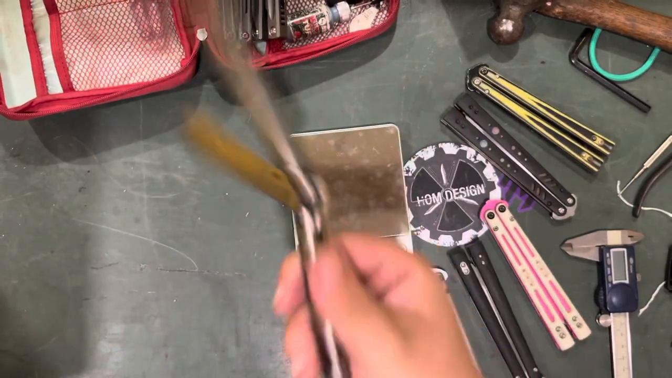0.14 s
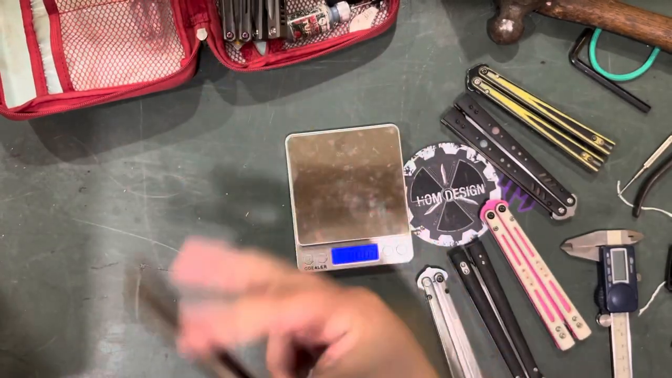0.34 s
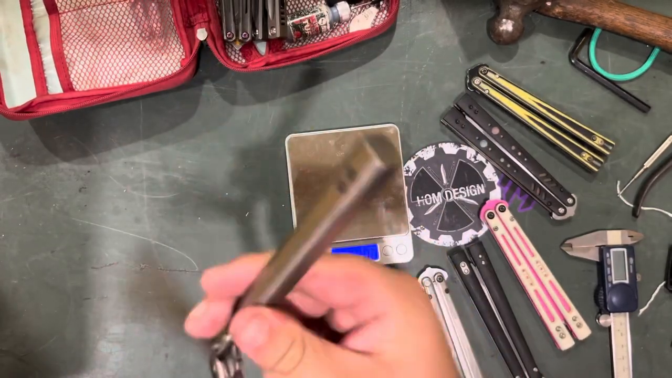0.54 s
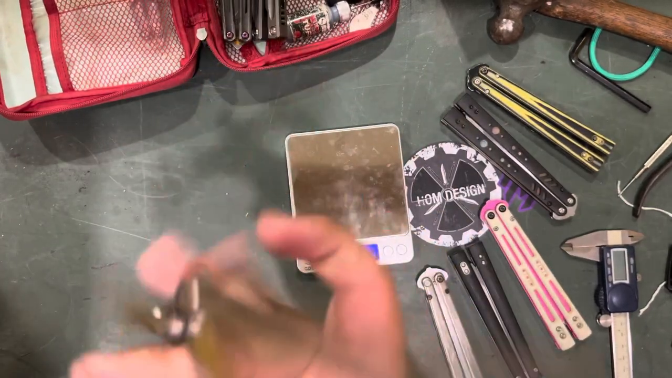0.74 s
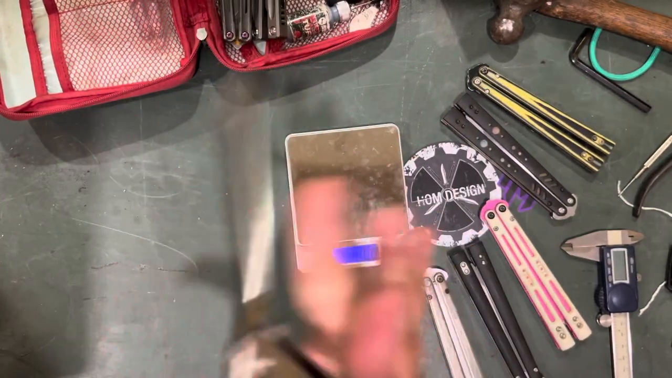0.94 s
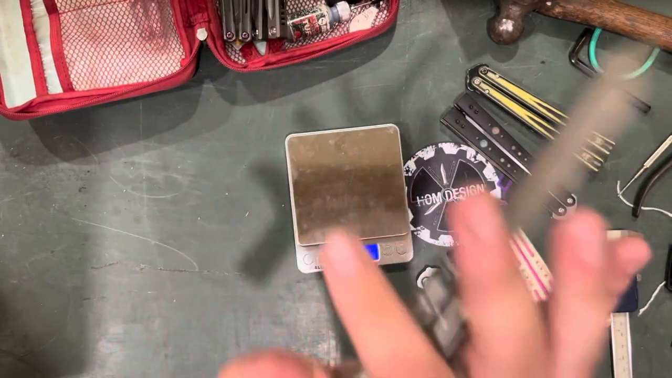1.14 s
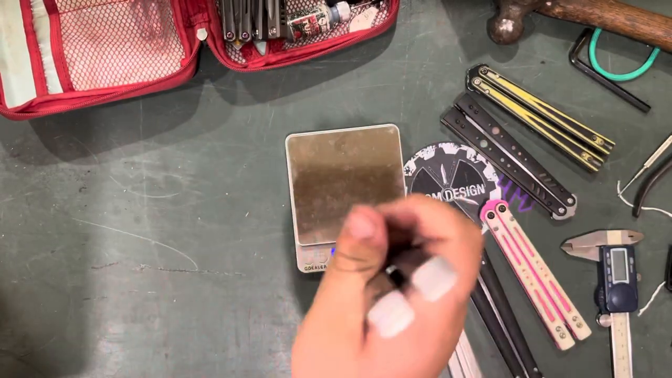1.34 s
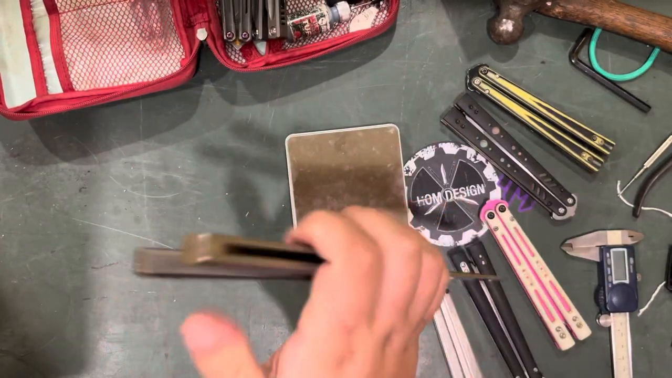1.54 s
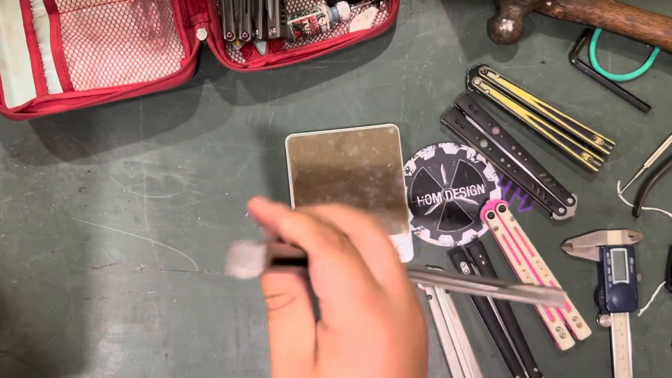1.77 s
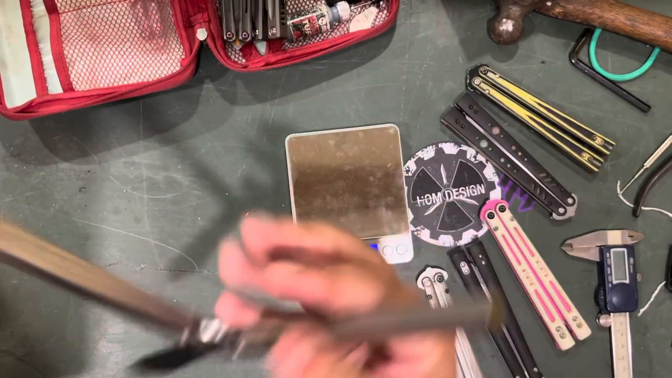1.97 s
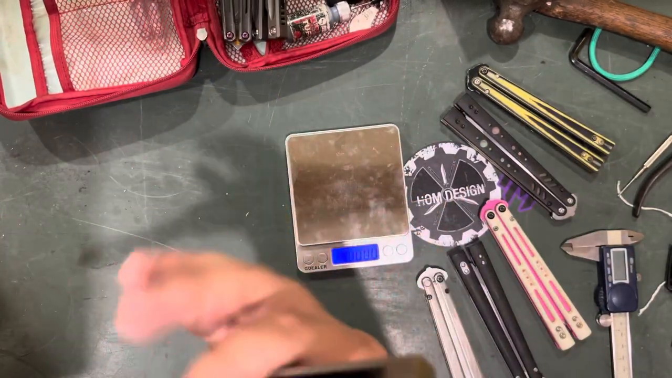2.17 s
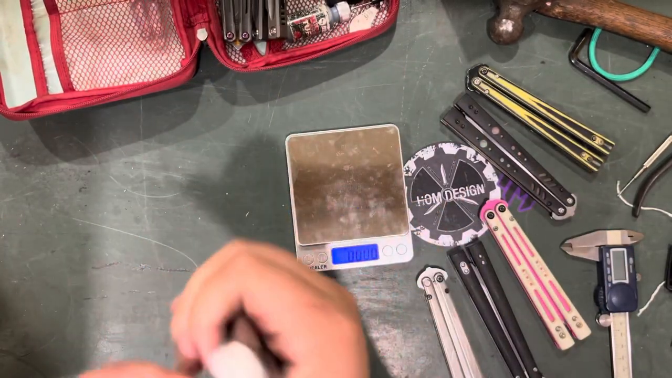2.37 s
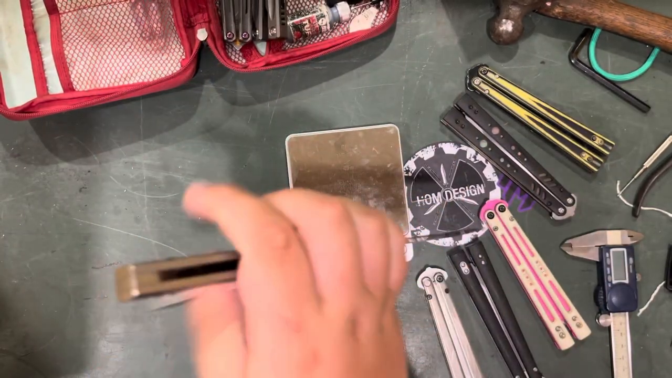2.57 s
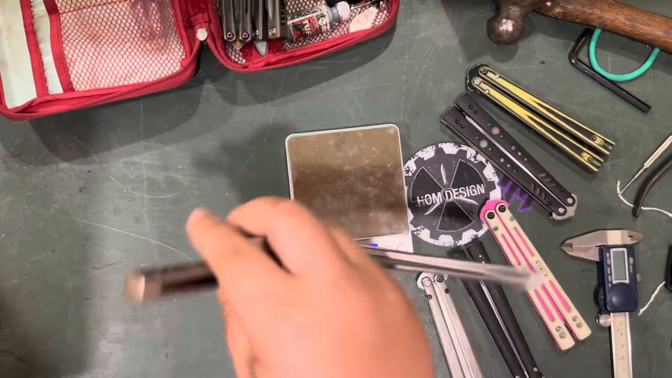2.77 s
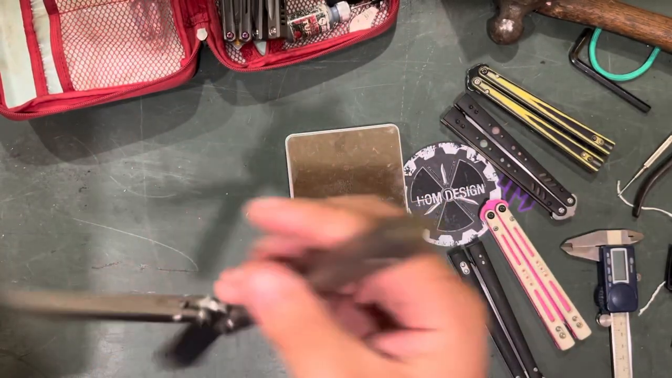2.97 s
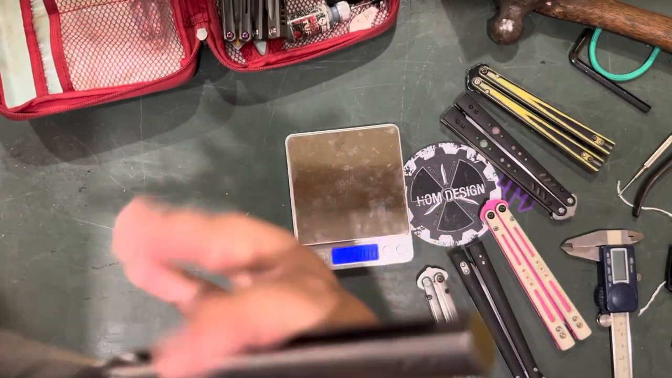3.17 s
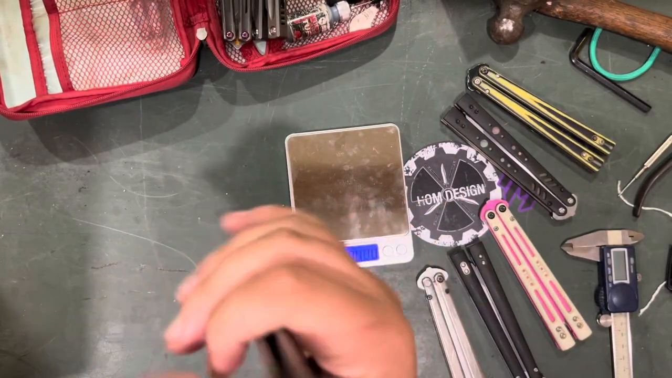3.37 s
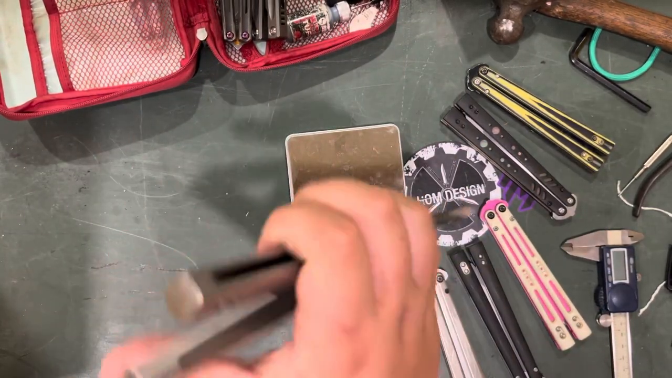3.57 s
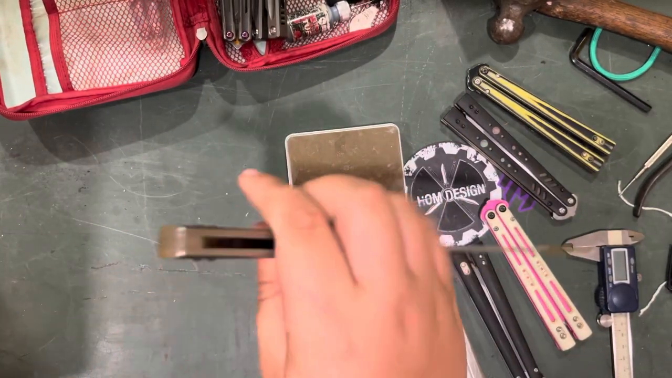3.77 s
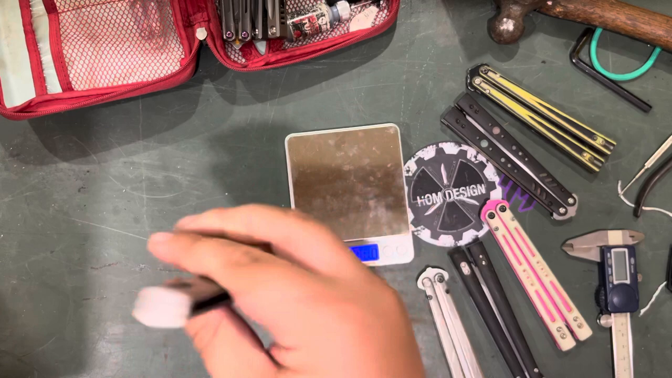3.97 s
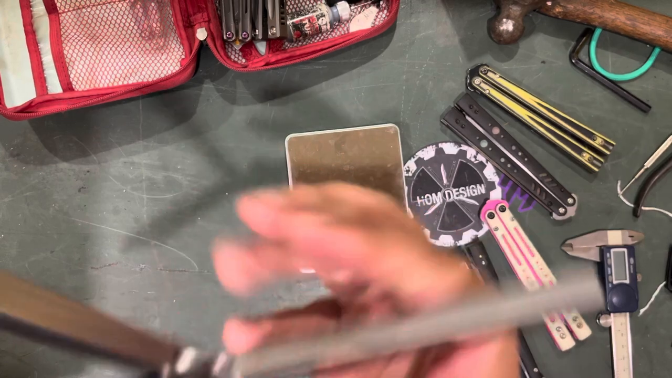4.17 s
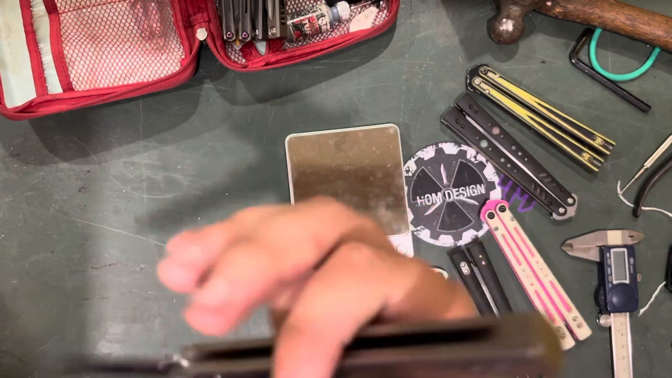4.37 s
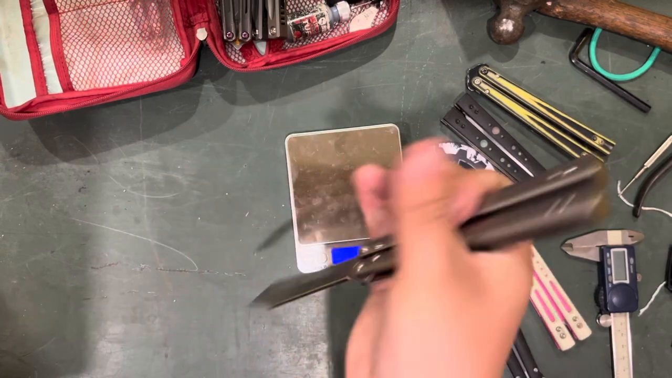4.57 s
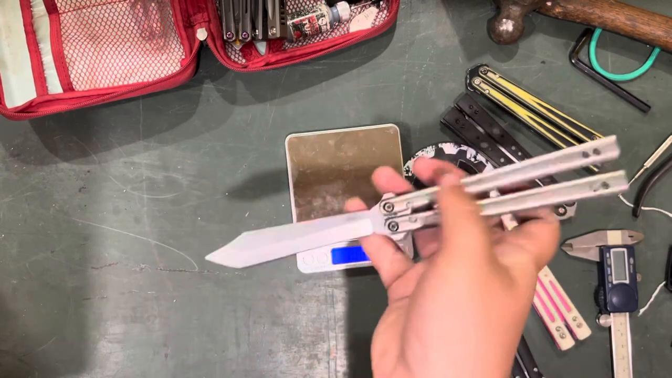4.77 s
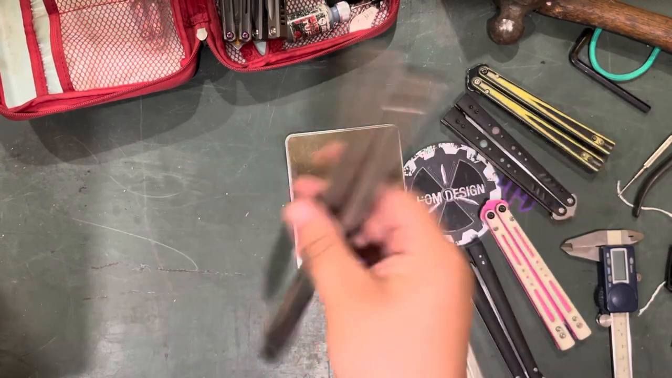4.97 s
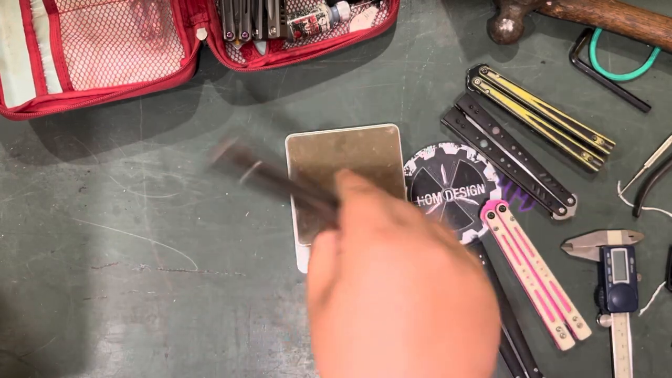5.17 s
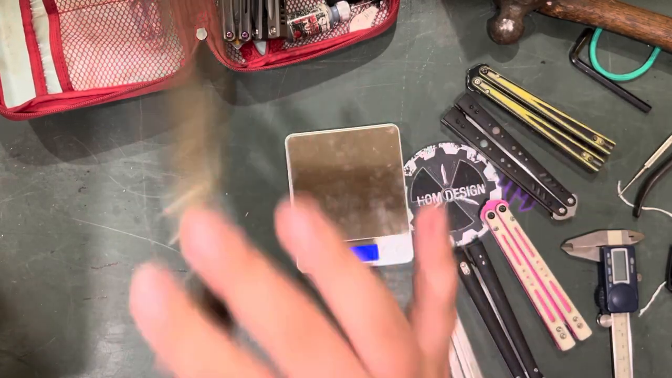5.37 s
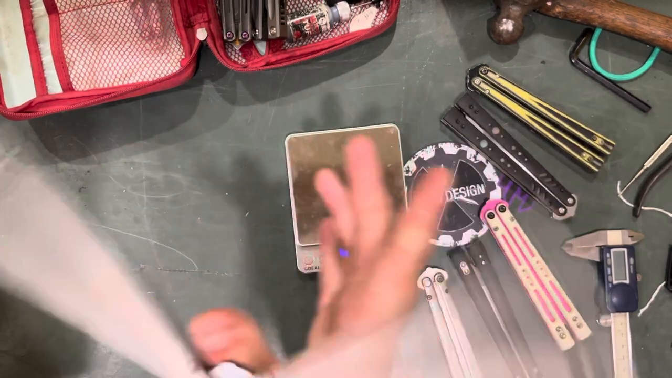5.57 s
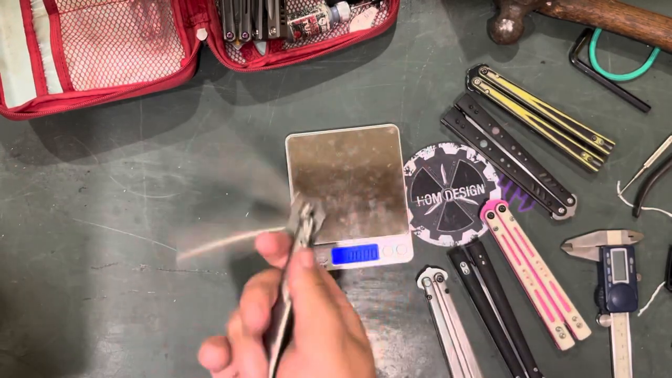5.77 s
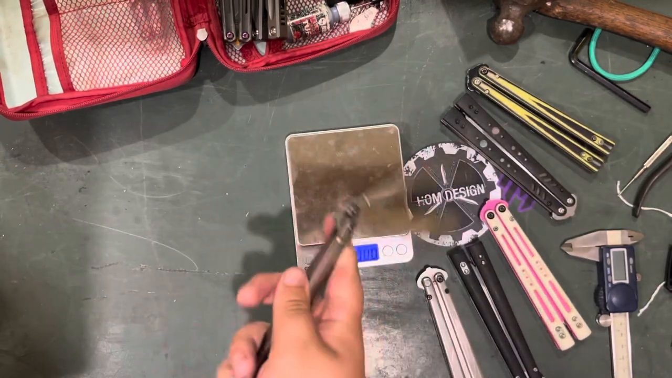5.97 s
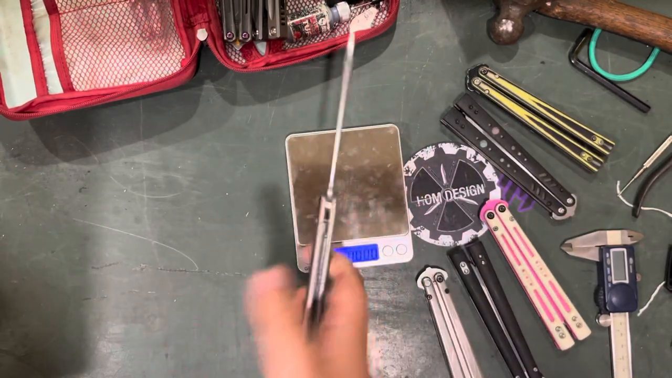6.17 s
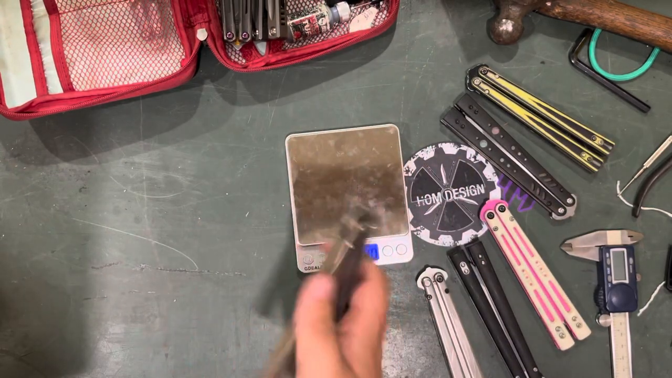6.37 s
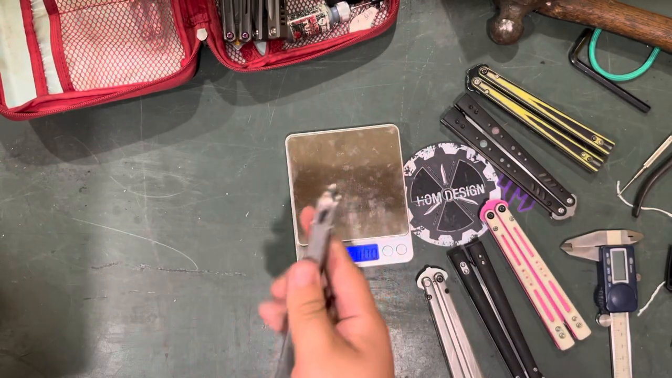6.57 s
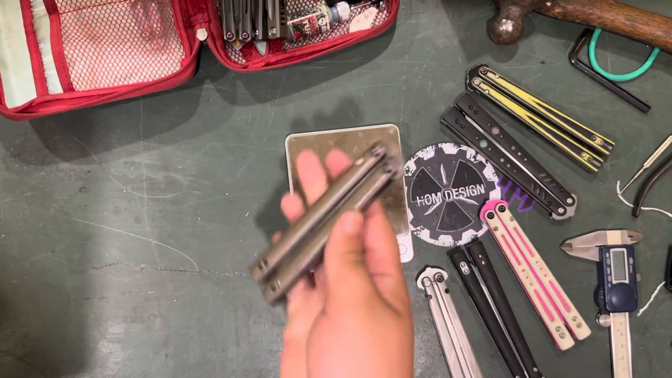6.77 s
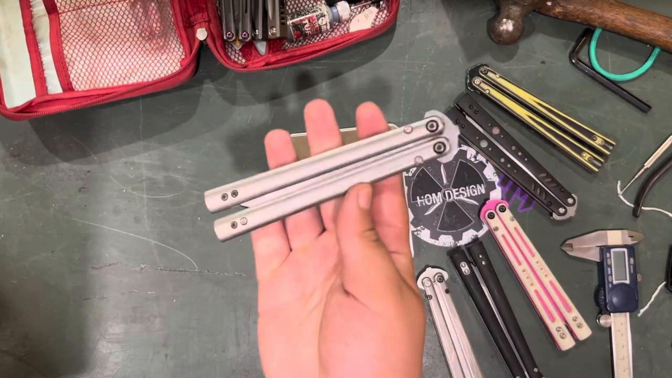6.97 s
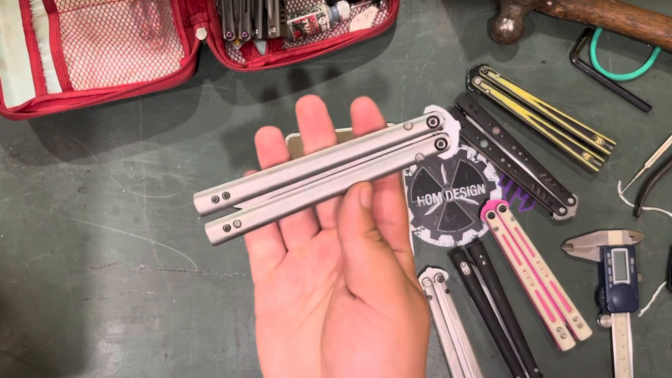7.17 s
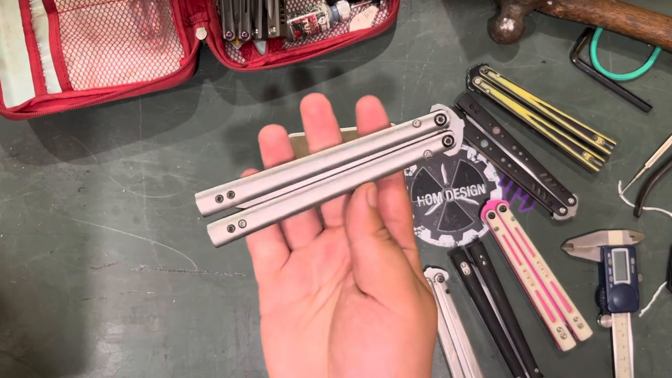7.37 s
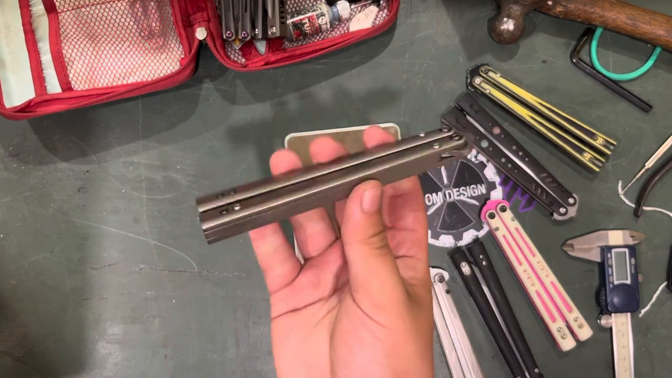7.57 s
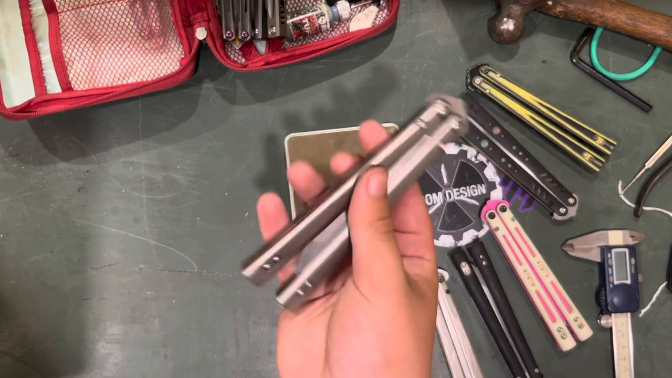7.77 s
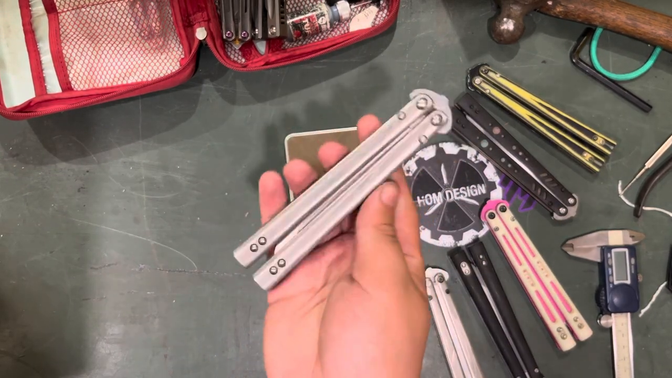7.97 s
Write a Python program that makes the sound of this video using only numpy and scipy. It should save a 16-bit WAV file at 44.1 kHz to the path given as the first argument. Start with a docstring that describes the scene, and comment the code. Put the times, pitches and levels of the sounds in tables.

```python
"""Butterfly knife in a small room

A swung handle clacks on its stop pin, bounces in rattles, and chatters to rest in a buzz of rising pitch;
each blow sums a pressure pulse, decaying modes of the gripped metal and a crack of filtered noise.
Clusters of close sines ring on when a part swings free, and sinking sines thump in the palm.
Shaped noise makes sliding fingers, a low rumble and a fan, whose hum is three wavering sines.
Decaying noise bands answer as the room, and two ports receive knife, hand and room with unequal phase."""
import sys
import numpy as np
from scipy import signal
from scipy.fft import rfft, irfft
from scipy.io import wavfile
from scipy.ndimage import uniform_filter1d

SR = 44100
rng = np.random.default_rng(int(sys.argv[2]) if len(sys.argv) > 2 else 0)


def inscribe(sig):
    """Save sig as 16-bit PCM at rate SR to the path in sys.argv[1].

    A 1-D sig is mono; a 2-D sig holds one channel per row.
    Samples are clipped to [-1, 1] before scaling.
    """
    pcm = np.round(np.clip(np.atleast_2d(sig).T, -1, 1) * 32767)
    wavfile.write(sys.argv[1], SR, pcm.astype(np.int16))


N = 354190
TIME = np.arange(N) / SR  # seconds
BLOW_SAMPLES = 2048  # length of one blow
TOP_HZ = 16300  # upper edge of the output band
AIR_DB = -68  # moving air, before its trim and wander
MIDDLING_DB = -34.5  # handle-ring level of a middling blow

# Spectrum of fan and room air. Each row: frequency in Hz, relative density in dB per Hz.
AIR_SPECTRUM = [(25, -23.5), (55, -5.5), (85, -9.5), (113, -6.5), (180, -11.5), (215, -4), (270, -19.5),
                (410, -14), (700, -24.5), (1150, -25), (1500, -12), (1850, -13.5), (2600, -35.5),
                (13000, -54.5)]
# Hum of the fan. Each row: frequency in Hz, level in dB before trim and waver.
HUM_TONES = [(59.2, -72.5), (113.0, -73.5), (215.3, -76)]
# Low rumble of stirred air, with the deep part of the palm thump near 0.74 s.
# Each row: time in seconds, level in dB before trim and wander.
RUMBLE_LEVELS = [(0.0, -64.5), (0.15, -71.5), (0.62, -63), (0.74, -50.5), (0.78, -64), (2.48, -66.5),
                 (2.52, -64), (4.99, -80), (6.49, -70), (6.73, -80), (7.9, -64.5), (8.03, -67)]
# Spectrum of that rumble. Each row: frequency in Hz, relative level in dB.
RUMBLE_SPECTRUM = [(25, -29.5), (55, 0), (80, -6), (120, -5.5), (200, -21), (500, -51)]
# Fingers sliding on the handles. Each row: middle in seconds, length in seconds, level in dB before the grain.
FINGER_STROKES = [(0.357, 0.33, -87), (0.626, 0.53, -76), (0.987, 0.16, -61.5), (4.967, 0.13, -72),
                  (5.24, .16, -82), (5.452, 0.17, -74.5), (5.715, 0.107, -75.5), (7.747, 0.27, -81),
                  (7.999, 0.25, -80.5)]
# Spectrum of sliding skin. Each row: frequency in Hz, relative level in dB.
SKIN_SPECTRUM = [(300, -21), (1500, 2.0), (2400, -3.5), (5000, 3.0), (7000, -1), (9500, 3),
                 (12000, -16.0), (15000, -16.0)]
# Single strikes of a handle. Each row: start in seconds, handle-ring level in dB before trim,
# brightness in dB (lifts overtone, blade and pin tick).
SINGLE_CLACKS = [(0.4768, -63, 6), (0.7115, -29, 0.5), (0.8893, -57.5, 7), (1.067, -20.5, 0),
                 (1.583, -31, -10), (1.5983, -39, -8), (1.7433, -30, 2), (1.7885, -30.5, 3),
                 (1.817, -37.5, -3), (2.5888, -42.5, -10), (2.7582, -38.5, -9.5), (3.014, -42, -8.5),
                 (3.595, -37, -10), (3.7193, -59, -7.5), (3.904, -33, 1.5), (4.132, -31, -1.5),
                 (4.65, -43, -13), (4.8092, -58, 5.5), (5.7413, -61.5, -4.5), (5.7672, -60.5, -5),
                 (5.8545, -21, -1.5), (6.111, -20.5, -5), (6.1415, -32, 4.5), (6.279, -30, 5),
                 (6.3473, -13.5, -6.5), (6.3817, -22, 2), (7.9356, -44, -10.5), (7.9547, -45, -12)]
# Modes of the gripped knife. Each row: frequency in Hz before detuning, relative level in dB,
# time to decay by 60 dB in seconds.
KNIFE_MODES = [(2310, -10, 0.031), (2376, -5.5, 0.013), (2472, -4.5, 0.027), (2685, -0.5, 0.014),
               (2960, -4, 0.013), (3630, -7, 0.003), (3840, 4, 0.012), (4113, -0.5, 0.021),
               (4030, -7, 0.024), (5470, -5, 0.017), (5228, 3, 0.02), (5640, 0.5, 0.0049),
               (5670, 6.5, 0.0085), (6320, 7, 0.0061), (7150, 0, 0.011), (7800, -9.5, 0.0055),
               (8330, -9, 0.012), (9030, 0, 0.0082), (9180, -1.5, 0.014), (9657, 2.5, 0.0057),
               (10730, -3, 0.0043), (13900, -4.5, 0.0049), (14600, -9.5, 0.0089)]
# Bands of handle ring, overtone, blade and pin tick. Each row: lowest Hz, highest Hz.
PART_BANDS = [(1800, 3300), (3300, 4600), (4600, 7500), (7500, 16500)]
# Crack of metal on metal. Each row: frequency in Hz, relative level in dB.
CRACK_SPECTRUM = [(1800, -6.5), (2300, 6.5), (6000, 9.5), (10300, 9.5), (12000, -6), (15500, -9.5),
                  (16500, -24)]
# Balance of knock, overtone, blade and pin tick in a middling blow. Each row: dB relative to the handle ring,
# further dB per dB of force.
FORCE_COLOUR = [(-21.5, -0.4051), (-3.5, -0.03), (0, 0.13), (-2, 0.2)]
# The knife landing in the hand. Each row: time in seconds, peak level in dB before trim, base pitch in Hz.
PALM_CATCHES = [(.477, -38, 206), (.71, -31, 319), (.887, -39.5, 104), (.98, -35, 380), (1.064, -33.5, 210),
                (1.743, -36.5, 406), (1.788, -32.5, 413), (2.757, -40, 389), (3.902, -40, 415),
                (4.65, -56.5, 105.3), (6.347, -27.5, 560), (6.383, -26, 396), (6.392, -25, 520),
                (6.445, -31, 250), (6.486, -30.5, 565)]
# Slap of skin on the handle. Each row: multiple of the catch's base pitch, relative level in dB.
SLAP_SPECTRUM = [(.06, -18.5), (.25, -0.5), (1, 2), (2, -7), (4, -28.5), (12, -56.5)]
# Parts swinging free. Each row: start in seconds, middle of the cluster in Hz, initial level in dB.
RINGING_PARTS = [(0.714, 5126, -48), (0.98, 5167, -36), (1.584, 2437, -37.5), (1.744, 5166, -46),
                 (1.788, 5036, -39.5), (3.014, 5270, -53.5), (3.596, 2433, -54.5), (3.901, 5160, -42.5),
                 (4.49, 2502, -41), (5.855, 5110, -32.5)]
# Handle bouncing on its pin. Each row: start in seconds, end in seconds, first gap in seconds,
# settled gap in seconds, share of the extra gap kept per bounce, handle-ring level in dB before trim,
# level change by the end in dB, then lifts of knock, overtone and brightness in dB.
PIN_RATTLES = [(.979, 1.064, .021, .0117, .05, -20, -7, 9, -5.5, 3),
               (2.0617, 2.136, .0229, .0074, .365, -19.5, 1.5, 8, -5, -1.5),
               (2.1454, 2.219, 0.022, .0037, .636, -23, 3, 4.5, -5, -1.5),
               (3.111, 3.176, 0.027, .0151, 0.009, -22.5, -0.5, 10, -2, 5.5),
               (3.184, 3.261, 0.02, .003, .77, -21.5, -1, 9.5, -4.5, 1.5),
               (4.2333, 4.316, .0277, .0114, .51, -19, 0.5, 6, -1, 0.5),
               (4.328, 4.404, .021, .0054, .647, -20, 0.5, 5, -3, -1),
               (6.3915, 6.443, .0148, .017, .4, -20.5, -8.5, 5, 7.5, -1)]
# Handle chattering to rest. Each row: start in seconds, end in seconds, first gap in seconds,
# handle-ring level in dB, level change by the end in dB, then lifts of knock, overtone and brightness in dB.
RESTING_CHATTERS = [(1.066, 1.1, .0027, -29, -14, 10, 2, 3.5), (2.2234, 2.31, .0057, -26, -12, 3, -1, 2.5),
                    (3.2674, 3.415, .0073, -26.5, -21, 7.5, 3, 5.5),
                    (4.4089, 4.495, .006, -23, -7.5, 2, 1.5, 2), (6.443, 6.501, .004, -30.5, -16, 5, 6, 1)]
# Response of the room. Each row: frequency in Hz, gain in dB, time to decay by 60 dB in seconds.
ROOM_RESPONSE = [(150, -7.5, 0.99), (494, 0, 0.37), (1110, -2, 0.16), (2640, -7.5, 0.4), (4100, -6, 0.41),
                 (5200, -7, 0.47), (8900, -12.5, 0.42), (14060, -15.5, 0.26)]
# The two microphone ports. Each row: frequency in Hz, phase lead of the left in radians, left minus right in dB.
PORT_RESPONSE = [(300, -0.1, -1), (1200, 0.7, -2), (3100, -1.3, -4), (4800, -0.0, -2), (5300, 2.1, -5),
                 (6300, 2.9, -3), (7500, 4.8, 0), (8700, 6.2, 0), (9700, 6.8, 0), (12300, 9.4, 0),
                 (15000, 11.8, 0), (16500, 12.3, -4)]


def amp(db):
    """Amplitude ratio of a level in decibels."""
    return 10 ** (np.asarray(db) / 20)


def unit(x):
    """Normalization to an rms of 1."""
    return x / np.sqrt(np.mean(x ** 2))


def add(track, s, sound):
    """Superposition: a sound is summed into the track from time s."""
    i = int(round(s * SR))
    track[..., i:i + sound.shape[-1]] += sound[..., :N - i]


def along(hz, table, axis=1):
    """Interpolation of a table's column on a logarithmic frequency axis."""
    table = np.array(table, float)
    return np.interp(np.log(hz + 1), np.log(table[:, 0]), table[:, axis])


def noise(size, spectrum, lo=0, hi=SR):
    """Spectral shaping of white noise between two edges in Hz, to an rms of 1."""
    hz = np.fft.rfftfreq(size, 1 / SR)
    gain = amp(along(hz, spectrum)) * (hz >= lo) * (hz < hi)
    return unit(irfft(rfft(rng.standard_normal(size)) * gain, size))


def walk(rate):
    """Random wander: about `rate` normal draws a second, smoothed by a moving average."""
    k = int(SR / rate)
    held = np.repeat(rng.standard_normal(N // k + 1), k)
    return uniform_filter1d(held, k)[:N]


def fan(air_db=-3, hum_db=-3, side_db=-11, waver_db=1.1):
    """Turbulence and motor tones: soft air noise, nearly alike left and right, with a wavering hum."""
    middle = noise(N, AIR_SPECTRUM, lo=13)
    side = noise(N, AIR_SPECTRUM, lo=38) * np.array([[1], [-1]])
    air = middle + amp(side_db) * side
    hum = 0
    for hz, db in HUM_TONES:
        level = amp(db + hum_db + waver_db * walk(9.2))
        hum = hum + level * np.sin(2 * np.pi * hz * TIME + 0.37 * walk(7.9))
    return air * amp(AIR_DB + air_db + 2.1 * walk(10.0)) + np.sqrt(2) * hum


def low_rumble(rumble_db=-2):
    """Low-frequency noise: an uneven rumble of stirred air, with the deep part of the palm thump near 0.74 s."""
    s, db = np.transpose(RUMBLE_LEVELS)
    rumble = noise(N, RUMBLE_SPECTRUM, lo=20, hi=500)
    return rumble * amp(np.interp(TIME, s, db) + rumble_db + 2.1 * walk(5.9))


def fingers(grain_db=5):
    """Sliding friction: skin on metal excites shaped noise in short, faint, uneven strokes."""
    strokes = np.zeros(N)
    for s, length, db in FINGER_STROKES:
        add(strokes, s - length / 2, amp(db) * np.hanning(int(length * SR)))
    return noise(N, SKIN_SPECTRUM) * strokes * amp(grain_db * walk(80))


def colour(db, knock_db, overtone_db, bright_db):
    """Force-dependent spectrum: a harder blow has relatively more pin tick and less knock."""
    base_db, slope = np.transpose(FORCE_COLOUR)
    return base_db + slope * (db - MIDDLING_DB) + np.array([knock_db, overtone_db, bright_db, bright_db])


def grip(detune=0.0088, scatter_db=1.0, spread=0.27, spread_top_hz=6500):
    """Modal vibration: one hold detunes the decaying modes; the low ones radiate unevenly to the ports."""
    hz, db, t60 = np.transpose(KNIFE_MODES)
    pitch, size, phase = rng.standard_normal((3, len(hz)))
    shade, turn = rng.standard_normal((2, 2, len(hz)))
    uneven = spread * (hz < spread_top_hz) * (shade / 2 + 1j * turn)
    weights = amp(db + scatter_db * size) * np.exp(2j * np.pi * phase + uneven)
    poles = 2j * np.pi * hz * (1 + detune * pitch) - np.log(1000) / t60
    return weights[:, :, None] * np.exp(np.outer(poles, np.arange(BLOW_SAMPLES) / SR))


def knock(low_hz=480, high_hz=1450, body_hz=455, body_s=0.0025, body=0.03):
    """Impulsive radiation: the stopped handle pushes air and nods the hand; like pulses in quick turn make a pitch."""
    t = np.arange(BLOW_SAMPLES) / SR
    sos = signal.butter(3, [low_hz, high_hz], "band", fs=SR, output="sos")
    nod = body * np.cos(2 * np.pi * body_hz * t) * np.exp(-t / body_s)
    nod = nod * (1 - np.exp(-t * high_hz))
    return signal.sosfilt(sos, signal.unit_impulse(BLOW_SAMPLES)) + nod


def attack_level(x, db):
    """Normalization by attack: db is the rms level over the first 5 ms."""
    return amp(db) * x / np.sqrt(np.mean(x[..., :SR // 200] ** 2))


def blow(rings, db, colour_db, play, crack_db, crack_s=0.0027, play_s=.0016):
    """Impact excitation: knock, modes and crack, the metal struck again as the pivot takes up its play."""
    t = np.arange(BLOW_SAMPLES) / SR
    hz = np.array(KNIFE_MODES)[:, 0]
    lag = int(SR * play_s * rng.uniform(0.27, 1.2))
    rise = 1 - np.exp(-t / .0004)
    knock_db, *metal_db = colour_db
    out = attack_level(knock(), db + knock_db)
    # the handle ring is the reference, 0 dB
    for (lo, hi), part_db in zip(PART_BANDS, [0, *metal_db]):
        ring = rings[:, (hz >= lo) & (hz < hi)].sum(axis=1).imag
        crack = noise(BLOW_SAMPLES, CRACK_SPECTRUM, lo, hi) * np.exp(-t / crack_s)
        part = (unit(ring) + amp(crack_db) * unit(crack)) * rise
        second = np.pad(part, ((0, 0), (lag, 0)))[:, :BLOW_SAMPLES]
        out = out + attack_level(part + play * second, db + part_db)
    return out


def clacks(crack_db, play, trim_db=-1.19):
    """Single impact: the handle strikes once, each time in a fresh hold of the knife."""
    out = np.zeros((2, N))
    for s, db, bright_db in SINGLE_CLACKS:
        add(out, s, blow(grip(), db + trim_db, colour(db, 0, bright_db, bright_db), play, crack_db))
    return out


def palm(thump_db=-3, start=1.15, end=0.7, sink_s=0.01, decay_s=0.0068, slap_db=-6, slap_s=0.01):
    """Yielding contact: flesh gives way in a thump of sinking pitch and a slap scaled to the base pitch."""
    out, t = np.zeros(N), TIME[:2 * BLOW_SAMPLES]
    for s, db, hz in PALM_CATCHES:
        pitch = hz * (end + (start - end) * np.exp(-t / sink_s))
        tone = np.sin(2 * np.pi * np.cumsum(pitch) / SR) * np.exp(-t / decay_s)
        slap = noise(len(t), np.array(SLAP_SPECTRUM) * [hz, 1]) * np.exp(-t / slap_s)
        thump = (tone + amp(slap_db) * slap) * (1 - np.exp(-t / 0.00063))
        add(out, s, amp(db + thump_db) * thump / np.abs(thump).max())
    return out


def free_rings(ring_db=0, t60=0.4, blade_hz=5100, width=0.035, count=13):
    """Beating of close modes: a free ring shimmers, and the hand damps lower clusters sooner."""
    out, t = np.zeros(N), TIME[:SR // 2]
    for s, hz, db in RINGING_PARTS:
        offsets = np.linspace(-1, 1, count) + rng.standard_normal(count) / count
        partials = hz * (1 + width * offsets)
        phases = 2 * np.pi * (np.outer(partials, t) + rng.random((count, 1)))
        cluster = np.sin(phases).sum(axis=0)
        decay = np.exp(-np.log(1000) * t / (t60 * np.sqrt(hz / blade_hz)))
        add(out, s, amp(db + ring_db) * unit(cluster) * decay)
    return out


def bounce_times(start, end, first_gap, settled_gap, kept):
    """Geometric relaxation: the swing presses the handle home and the gaps settle."""
    s, gap = start, first_gap
    while s < end:
        yield s
        s += gap
        gap = settled_gap + (gap - settled_gap) * kept


def rattles(crack_db, play, fade_shape, trim_db=-1.19, uneven_db=1):
    """Repeated impact: the knife still turns, so each bounce lands on a new spot with its own colour."""
    out = np.zeros((2, N))
    for start, end, first_gap, settled_gap, kept, db, fade_db, *lift_db in PIN_RATTLES:
        for s in bounce_times(start, end, first_gap, settled_gap, kept):
            size_db = db + fade_db * ((s - start) / (end - start)) ** fade_shape
            colour_db = colour(size_db, *lift_db) + uneven_db * rng.standard_normal(len(FORCE_COLOUR))
            add(out, s, blow(grip(), size_db + trim_db, colour_db, play, crack_db))
    return out


def chatters(crack_db, fade_shape, smooth_db=-4, last_gap_s=0.0016):
    """Periodic impact: like bounces on one spot, at shrinking gaps, fuse into a buzz of rising pitch."""
    out = np.zeros((2, N))
    for start, end, first_gap, db, fade_db, *lift_db in RESTING_CHATTERS:
        rings, s = grip(), start
        while s < end:
            done = (s - start) / (end - start)
            size_db = db + fade_db * done ** fade_shape + 0.85 * rng.standard_normal()
            add(out, s, blow(rings, size_db, colour(size_db, *lift_db), 0, crack_db + smooth_db))
            s += first_gap + (last_gap_s - first_gap) * done
    return out


def knife(crack_db=-4, play=0.6, fade_shape=1.5):
    """Superposition of the knife's impacts: single clacks, rattles and chatters."""
    return clacks(crack_db, play) + rattles(crack_db, play, fade_shape) + chatters(crack_db, fade_shape)


def room(dry, likeness=0.25, onset_s=0.0045):
    """Diffuse reverberation: noise bands, each with its own decay, partly alike at both ports."""
    t = TIME[:int(.8 * SR)]
    hz = np.fft.rfftfreq(len(t), 1 / SR)
    common, *own = rng.standard_normal((3, len(t)))
    spectra = rfft(np.sqrt(likeness) * common + np.sqrt(1 - likeness) * np.array(own))
    edges = np.geomspace(60, 18000, 17)
    tail = 0
    for lo, hi in zip(edges, edges[1:]):
        centre = np.sqrt(lo * hi)
        decay = np.exp(-np.log(1000) * t / along(centre, ROOM_RESPONSE, axis=2))
        fade = decay * (1 - np.exp(-(t / onset_s) ** 2))
        band = irfft(spectra * (hz >= lo) * (hz < hi), len(t))
        tail = tail + amp(along(centre, ROOM_RESPONSE)) * band * fade / np.linalg.norm(fade)
    return signal.fftconvolve(dry[None], tail, axes=1)[:, :N]


def ports(sound):
    """Phase and level differences: the sound reaches the two ports with different delay and shading."""
    hz = np.fft.rfftfreq(N, 1 / SR)
    port_hz, lead, tilt_db = np.transpose(PORT_RESPONSE)
    lead = np.interp(hz, port_hz, lead)
    tilt = amp(np.interp(hz, port_hz, tilt_db))
    # the last factor keeps the summed power of the two ports constant
    gains = np.array([tilt, np.exp(-1j * lead)]) * np.sqrt(2 / (1 + tilt ** 2))
    return irfft(rfft(sound) * gains, N)


def scene(palm_room_db=-6):
    """Direct and reverberant fields: knife and hand, the room's answer, the low rumble and the fan."""
    metal, thumps = free_rings() + fingers(), palm()
    # the walls hear the knife from all sides: fresh draws, more crack, less play, both ports averaged
    all_round = knife(crack_db=-2.5, play=.2).mean(axis=0)
    direct = knife() + metal + thumps
    reverberant = room(all_round + metal + amp(palm_room_db) * thumps)
    return ports(direct + reverberant) + low_rumble() + fan()


def record(dry):
    """Clipping and band limiting: peaks stop at full scale, then a low-pass cuts the top."""
    low_pass = signal.ellip(8, .2, 70, TOP_HZ, fs=SR, output="sos")
    return signal.sosfilt(low_pass, np.clip(dry, -1, 1))


dry = scene()
out = record(dry)
inscribe(out)
```